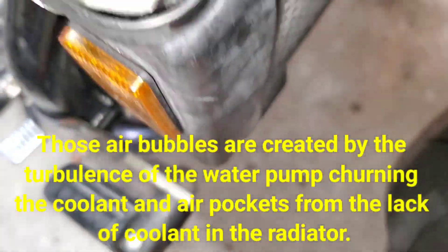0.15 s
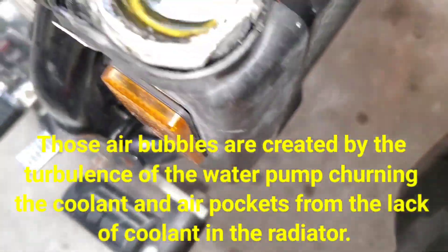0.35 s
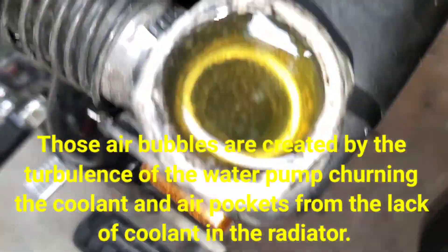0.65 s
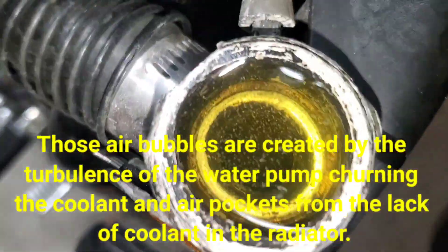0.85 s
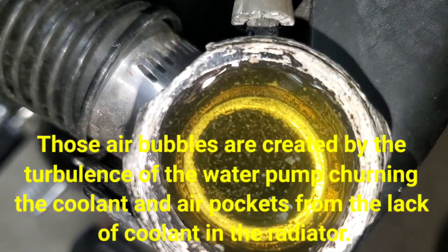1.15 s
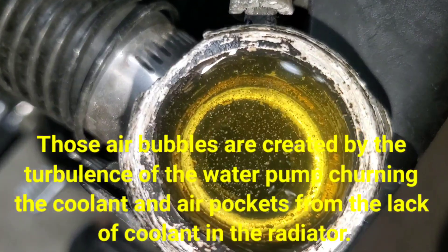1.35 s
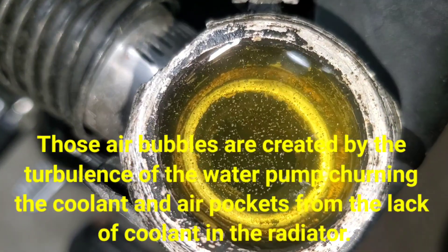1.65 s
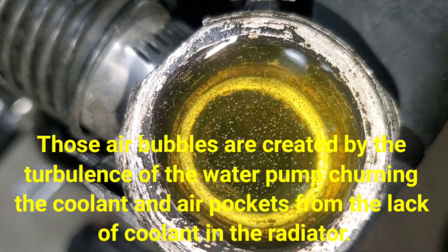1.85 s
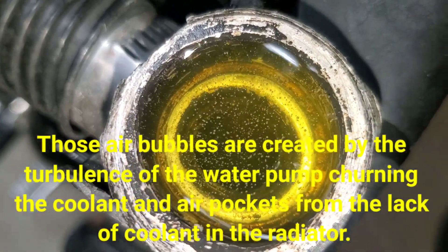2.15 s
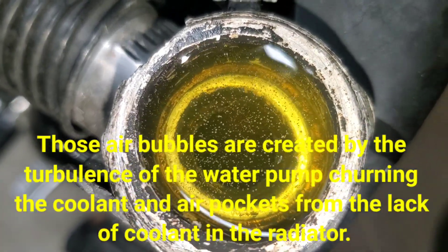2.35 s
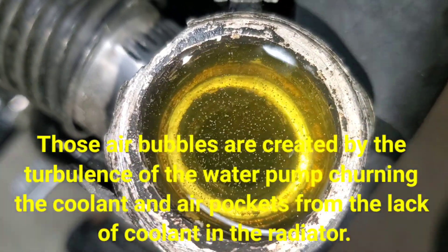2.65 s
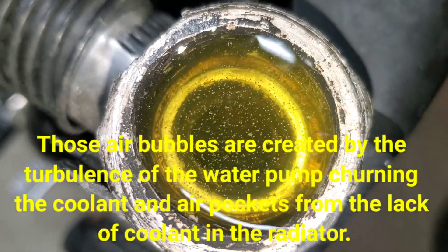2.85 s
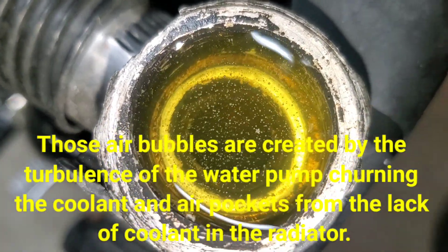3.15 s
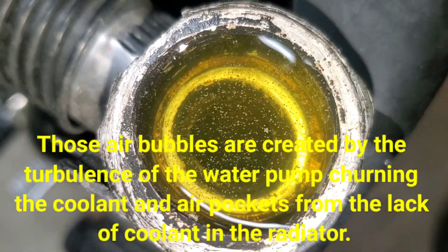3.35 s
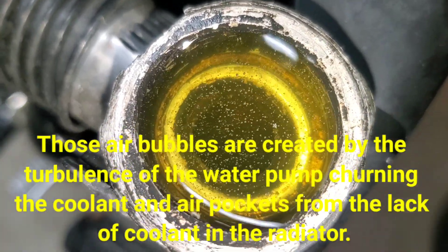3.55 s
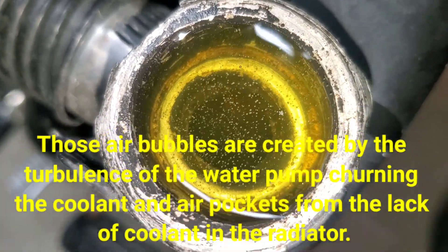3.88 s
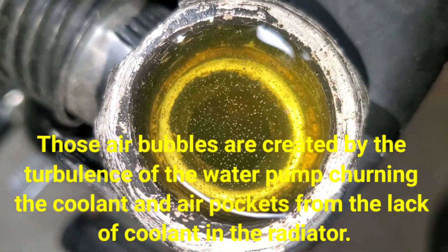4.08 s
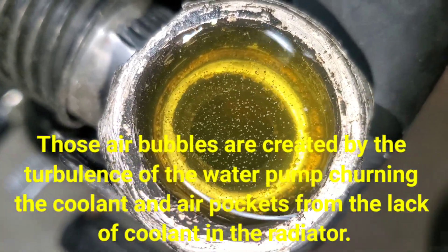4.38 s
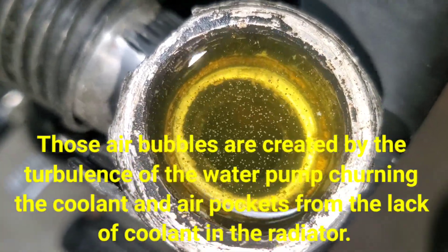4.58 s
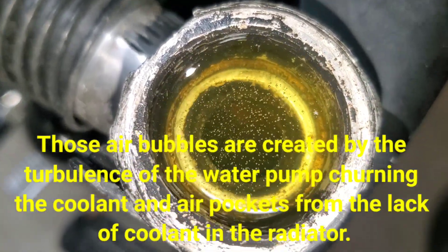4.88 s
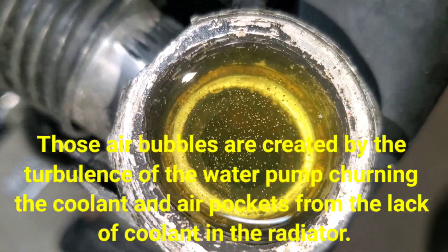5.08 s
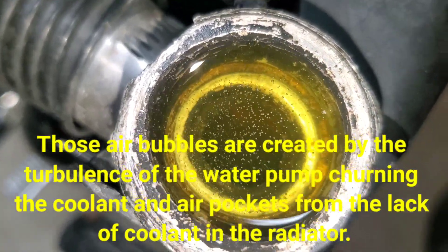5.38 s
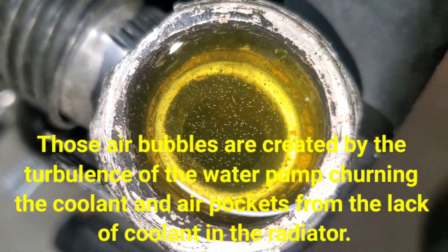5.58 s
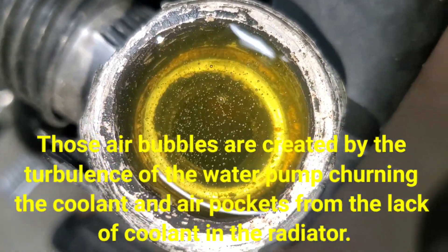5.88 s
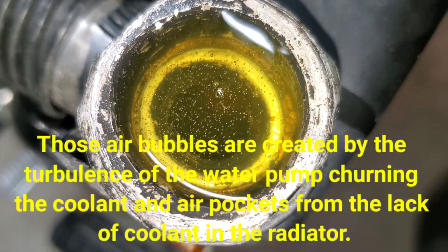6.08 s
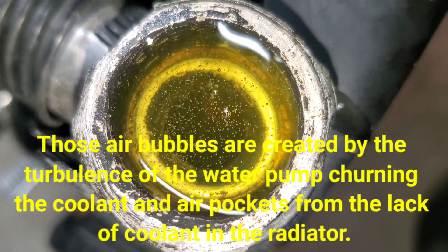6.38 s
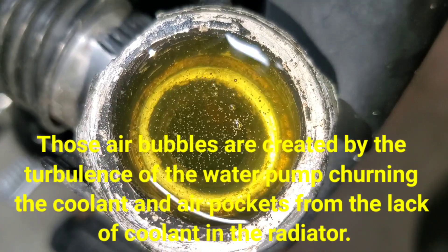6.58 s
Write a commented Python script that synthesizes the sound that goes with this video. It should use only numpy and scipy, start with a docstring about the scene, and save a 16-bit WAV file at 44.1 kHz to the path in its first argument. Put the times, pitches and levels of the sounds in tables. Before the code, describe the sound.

A four-cylinder motorcycle engine is heard close up in a garage with slight reverberation. From 0 to 4.4 seconds it idles unevenly: low, lumpy exhaust thumps about sixteen times a second, one stronger than the others, ringing the pipe and silencer. Over this lie broad chain and bearing hiss, rapid valve tapping, a thin high cover resonance and a gear whine around 1 kilohertz. The idle stumbles near 1.8, 2.5, 2.9, 3.2 and 3.9 seconds, sagging slightly with heavier, hollow thuds. At 4.4 the throttle is twisted; the engine climbs to over three times idle speed by 4.9, the firings merging into a boom with intake bark, rushing air and raspy cracks. It shuts and winds down from about 4.9 to 6, roughening as it falls. The mechanical noise becomes much quieter around 6.1, then grows slightly as a slower, weaker, rougher idle continues until 6.7.

```python
"""A four-cylinder motorcycle idles lumpily in a garage, stumbles, is blipped once and sinks to a slower idle.
Uneven firings thump and ring the exhaust pipe and silencer; at speed they merge into a boom and crack
through the engine block. The open throttle barks with pure tones and rushing air. Close by, chain and
bearings hiss, valves tap, a thin cover sings and a gear whines in step with the engine."""
import sys
import numpy as np
from scipy import signal
from scipy.io import wavfile
from scipy.ndimage import uniform_filter1d

SR = 44100
rng = np.random.default_rng(int(sys.argv[2]) if len(sys.argv) > 2 else 0)


def inscribe(sig):
    """Save sig as 16-bit PCM at rate SR to the path in sys.argv[1].

    A 1-D sig is mono; a 2-D sig holds one channel per row.
    Samples are clipped to [-1, 1] before scaling.
    """
    pcm = np.round(np.clip(np.atleast_2d(sig).T, -1, 1) * 32767)
    wavfile.write(sys.argv[1], SR, pcm.astype(np.int16))


N = 296793

# the cylinders in firing order: (strength at idle, strength in a stumble, ring of its thump [Hz])
CYLINDERS = [(1, .9, 172), (.13, .18, 81), (.5, .74, 117), (.26, .06, 175)]
# one twist of the grip: when it starts, then how long the throttle opens, stays open and closes
THROTTLE_AT_S, OPEN_S, HOLD_S, CLOSE_S = 4.42, .16, .24, .12


def from_db(db):
    """Turn decibels into gain."""
    return 10 ** (np.asarray(db) / 20)


def rms_one(x):
    """Scale to an average power of 1."""
    return x / np.sqrt(np.mean(x ** 2) + 1e-20)


def in_time(rows):
    """Read a curve of (time, value) at every sample."""
    seconds, values = np.transpose(rows)
    return np.interp(np.arange(N) / SR, seconds, values)


def at_hz(points, hz):
    """Read a curve of (frequency, value) at any pitch, along a logarithmic frequency axis."""
    frequencies, values = np.transpose(points)
    return np.interp(np.log(hz), np.log(frequencies), values)


def gate(start, attack, hold, release):
    """Rise from 0 to 1, hold and fall back, all in seconds."""
    return np.interp(np.arange(N) / SR, start + np.cumsum([0, attack, hold, release]), [0, 1, 1, 0])


def cut(x, hz, kind, order=2):
    """Butterworth filter: keep the low, the high or a band of frequencies."""
    return signal.sosfilt(signal.butter(order, hz, kind, fs=SR, output="sos"), x)


def drift(rate):
    """Slow random wander with spread 1; a higher rate [Hz] wanders faster."""
    step = 40   # samples between the points of the wander
    r = np.exp(-2 * np.pi * rate * step / SR)
    noise = rng.standard_normal(N // step + 2002)
    slow = signal.lfilter([1], [1, -2 * r, r * r], noise)[2000:]   # skip the filter's start
    return np.interp(np.arange(N) / step, np.arange(len(slow)), rms_one(slow))


def resonate(x, modes):
    """Ring a set of resonances side by side, each given as (frequency, width, signed gain)."""
    out = 0
    for hz, width, gain in modes:
        r = np.exp(-np.pi * width / SR)   # a wider resonance dies faster
        feedback = [1, -2 * r * np.cos(2 * np.pi * hz / SR), r * r]
        out = out + gain * (1 - r * r) / 2 * signal.lfilter([1, 0, -1], feedback, x + 1e-18)
    return out


def evened(x, size=9000):
    """Hold the slow power at 1, averaged twice over `size` samples."""
    power = uniform_filter1d(uniform_filter1d(x ** 2, size), size)
    return x / np.sqrt(np.abs(power) + 1e-16)


def fading(clicks, seconds):
    """Turn each click into an envelope that dies away."""
    return signal.lfilter([1], [1, -np.exp(-1 / (seconds * SR))], clicks + 1e-18)


def garage(x, t60, wet_db):
    """Add a diffuse tail that falls 60 dB in t60 seconds and differs left and right."""
    t = np.arange(SR // 2) / SR
    tail = rng.standard_normal((2, len(t))) * from_db(-60 * t / t60)
    tail /= np.sqrt(np.sum(tail ** 2, axis=1, keepdims=True))
    wet = from_db(wet_db)
    echo = signal.fftconvolve(x[None], tail, axes=1)[:, :N]
    return (x + wet * echo) / np.hypot(1, wet)


def stumbles(lag_s):
    """Depth of stumbling: the fourth cylinder all but fades and the third catches, along a bell curve."""
    # (time of the deepest point [s], spread of the bell [s], depth [0-1])
    bells = [(1.76, .04, .8), (2.52, .05, .4), (2.86, .04, .8), (3.17, .075, 1), (3.88, .04, .4)]
    t = np.arange(N) / SR - lag_s
    return sum(depth * np.exp(-.5 * ((t - middle) / spread) ** 2) for middle, spread, depth in bells)


def misfiring():
    """How badly the engine runs, 0-1: in each stumble, and for good from the start of the blip."""
    rough_from_blip = .85
    blip_begun = np.clip((np.arange(N) / SR - THROTTLE_AT_S) / OPEN_S, 0, 1)   # rises as the throttle opens
    return np.clip(stumbles(0) + rough_from_blip * blip_begun, 0, 1)


def cylinder(turn):
    """Which cylinder's quarter of the cycle it is; `turn` counts four-stroke cycles."""
    return (turn * len(CYLINDERS)).astype(int) % len(CYLINDERS)


def strokes(turn, spread_db, count):
    """Clicks spaced evenly round the cycle, each of slightly different strength."""
    at = np.flatnonzero(np.diff(np.floor(turn * count)) > 0) + 1
    clicks = np.zeros(N)
    clicks[at] = from_db(spread_db * rng.standard_normal(len(at)))
    return clicks


def firings(turn, spread_db):
    """One pulse per cylinder and cycle; weak cylinders make the idle lope."""
    idle, stumbling, _ = np.array(CYLINDERS)[cylinder(turn)].T
    strength = idle + misfiring() * (stumbling - idle)
    return strokes(turn, spread_db, count=4) * strength


def cover(rush_db):
    """The engine's shaking keeps a few narrow resonances of a thin cover singing."""
    # (frequency [Hz], width [Hz], signed gain)
    cover_modes = [(2503, 18, .4), (2603, 20, -1), (2652, 20, .7)]
    usual_db, follows = -48.5, .5   # follows: share of the swing of the mechanical noise
    level_db = usual_db + follows * (rush_db - np.median(rush_db))
    return evened(resonate(rng.standard_normal((2, N)), cover_modes)) * from_db(level_db)


def rush(turn, revs):
    """Chain, bearings and gears hiss in every band, pulsing with the valve strokes."""
    # hiss that counts double at idle and once at full revs: (frequency [Hz], level [dB])
    idle_colour = [(250, 3), (330, -2), (420, -4.5), (475, -1), (560, -7.5), (850, -4.5), (1200, -6),
                   (1800, -5.5), (2650, -5), (3800, -7.5), (5200, -9), (6300, -10.5), (8200, -11),
                   (14500, -12.5)]
    # hiss that comes in with the revs: (frequency [Hz], level [dB])
    rev_colour = [(270, 2.5), (400, -12.5), (500, -6.5), (650, -16.5), (950, -7.5), (1300, -7.5),
                  (2000, -8), (2650, -4.5), (3900, -10.5), (8000, -13), (14500, -16)]
    # how alike left and right are: (frequency [Hz], likeness [0-1])
    likeness = [(100, .97), (250, 0.51), (500, 0.7), (1000, 0.01), (15000, 0.015)]
    out = 0
    edges = 230 * 2 ** (np.arange(20) / 3)   # third-octave bands [Hz]
    white = rng.standard_normal((2, 2, N))
    for k, (low, high) in enumerate(zip(edges, edges[1:])):
        mid, side = cut(white[k % 2], [low, high], "band")   # neighbouring bands use separate noise
        hz = np.sqrt(low * high)
        alike = np.clip(at_hz(likeness, hz), -1, 1)
        hz = np.clip(hz, 330, 14000)
        colour_db = (2 - revs) * at_hz(idle_colour, hz) + revs * at_hz(rev_colour, hz)
        gain = from_db(colour_db + .62 * drift(30))
        stereo = np.sqrt(1 + alike) * mid + np.sqrt(1 - alike) * side * [[1], [-1]]
        out = out + gain * stereo
    # hold the treble steady before the pulsing is added
    treble_power = uniform_filter1d(cut(out.mean(axis=0), [1500, 12000], "band") ** 2, size=8000)
    pulsing = evened(1 + .5 * fading(strokes(turn, spread_db=5.5, count=8), seconds=.00037))
    return out / np.sqrt(treble_power) * pulsing * from_db(drift(2.35))


def valves(turn):
    """Eight valve taps a cycle rattle the engine cases, with separate noise left and right."""
    # (frequency [Hz], width [Hz], signed gain)
    cases = [(635, 28, 0.66), (850, 47, 0.32), (1325, 22, 0.64), (2013, 93, -0.44), (2627, 71, 0.69),
             (3050, 220, 0.2), (3350, 170, 0.079), (4330, 140, -0.24), (6340, 280, 0.2)]
    envelope = fading(strokes(turn, spread_db=3, count=8), seconds=.007)
    taps = envelope * rng.standard_normal((2, N))
    return evened(resonate(taps, cases))


def whine(turn, speed, throttle, revs):
    """Gear teeth mesh at a pitch tied to engine speed; the tone beads with each firing and breaks up if rough."""
    # level before the changes below: (time [s], level [dB])
    whine_curve = [(0, -38), (.4, -38), (.8, -39.3), (3.4, -39.3), (3.7, -37.5), (4.07, -37.5), (4.14, -41),
                   (4.4, -37), (5.3, -43), (5.6, -40.5), (5.85, -45), (6, -43.5), (6.15, -48.5),
                   (6.4, -44.5), (6.73, -43.5)]
    # how the gear case passes the whine: (frequency [Hz], level [dB])
    whine_colour = [(880, -1), (1020, 1.5), (1110, -2), (1230, -9), (1430, 1), (1560, -4), (1680, -1),
                    (2000, -6), (3500, -11)]
    teeth = 65.7   # whine cycles per engine cycle
    stumble_db, throttle_db = -2, -3   # change in a full stumble and with the throttle open
    level_db = in_time(whine_curve) + at_hz(whine_colour, teeth * speed)
    level_db = level_db + stumble_db * stumbles(0) + throttle_db * throttle
    surge = 2 * np.pi * turn
    wobble = (.55 + .3 * misfiring() + .5 * revs) * drift(45)
    mesh = np.sin(teeth * surge - .7 * np.cos(surge) + wobble)
    uneven_db = (2.2 + .8 * misfiring()) * drift(25)
    beads = evened(from_db(2.2 * np.cos(4 * surge) + 1.5 * np.sin(surge) + uneven_db))
    return evened(garage(mesh, t60=.06, wet_db=0), size=1800) * beads * from_db(level_db)


def bark(turn, speed, throttle):
    """Intake gulps sound a fan of engine orders and rushing air; louder with speed and open throttle."""
    # how the airbox passes the orders: (frequency [Hz], throttle open [dB], throttle shut [dB])
    airbox = np.array([(250, -38, -35), (300, -34, -34), (335, -38, -46), (380, -33, -46), (430, -41, -46),
                       (490, -28.5, -33), (540, -34, -46), (600, -29.5, -45), (690, -29.5, -44),
                       (760, -33, -46), (840, -29, -38), (920, -32, -48), (1010, -37, -41),
                       (1150, -50, -56)])
    # resonances of the rushing air: (frequency [Hz], width [Hz], signed gain)
    intake = [(350, 58, 0.67), (500, 73, -0.75), (695, 85, 1.0), (970, 66, -0.081)]
    air_open_db, air_shut_db = -37, -55   # at top speed
    db_per_octave = 15   # of engine speed
    odd_order_db = -4    # odd orders of the intake tone are weaker
    fan = 0
    for order in range(5, 23):
        hz = order * speed
        open_db, shut_db = at_hz(airbox[:, [0, 1]], hz), at_hz(airbox[:, [0, 2]], hz)
        db = throttle * open_db + (1 - throttle) * shut_db
        gain = from_db(db + odd_order_db * (order % 2) + 1.5 * drift(12))
        fan = fan + gain * np.sin(2 * np.pi * (order * turn + rng.random()) + .2 * drift(20))
    air = fading(firings(turn, spread_db=1.5), seconds=.0072) * rng.standard_normal(N)
    air = evened(cut(resonate(air, intake), 570, "high"), size=3000)
    air = air * from_db(air_shut_db + throttle * (air_open_db - air_shut_db))
    speed_db = db_per_octave * np.log2(speed / speed.max())
    return garage((fan + air) * from_db(speed_db), t60=.12, wet_db=-7)


def rasp(turn, revs, throttle):
    """At speed every firing cracks through the engine block, hardest with the throttle open."""
    # (frequency [Hz], width [Hz], signed gain)
    block = [(850, 290, 0.38), (1430, 240, -0.66), (2070, 610, 0.63), (2620, 320, -1.17)]
    level_db, shut_db = -34.5, -5   # at full revs with the throttle open; change when shut
    knocks = firings(turn, spread_db=3) + .3 * strokes(turn, spread_db=3, count=4)
    cracks = resonate(fading(knocks, seconds=.002) * rng.standard_normal(N), block)
    loudness = revs * from_db(level_db + shut_db * (1 - throttle))
    return garage(evened(cracks, size=3000) * loudness, t60=.25, wet_db=-3)


def boom(turn, speed, throttle):
    """Fast firings merge into low tones that sweep the exhaust's resonances and roughen as the throttle shuts."""
    # levels before the colour below, at top speed:
    # (engine order, throttle open [dB], throttle shut [dB], slope [dB per octave of engine speed])
    boom_orders = [(1, -29, -29, 0), (2, -17.5, -30, 0), (3, -33, -27, 2.5), (4, -27.5, -27, 6),
                   (6, -31, -33, 4)]
    # how the exhaust passes the tones: (frequency [Hz], level [dB])
    boom_colour = [(38, -32), (45, -0.5), (55, 5), (66, 5), (73, -1.5), (92, 1), (108, -4), (140, 1),
                   (170, 4), (195, 1.5), (210, 4.5), (260, -11.5), (320, -11)]
    lasts_s, fade_s = 1.53, .089   # from the twist until the engine is back at idle
    tones = 0
    rough = 1 - .7 * throttle
    for order, open_db, shut_db, slope_db in boom_orders:
        db = shut_db + throttle * (open_db - shut_db) + slope_db * np.log2(speed / speed.max())
        gain = from_db(db + at_hz(boom_colour, order * speed) + 3 * rough * drift(25))
        tones = tones + gain * np.sin(2 * np.pi * order * turn + .4 * rough * drift(20))
    swell = gate(THROTTLE_AT_S, fade_s, lasts_s - 2 * fade_s, fade_s)
    return garage(swell * tones, t60=.4, wet_db=-15)


def thump(ring_hz):
    """One gas pulse, centred on its suction peak: a low swell, rising to its ring as the valve shuts."""
    swell_hz, swell_s, shut_s, ring_s = 76, .0075, .004, .0086
    t = np.arange(-SR // 20, SR // 20 + 1) / SR
    hz = swell_hz + (ring_hz - swell_hz) * (1 + np.tanh(t / shut_s)) / 2
    angle = 2 * np.pi * np.cumsum(hz) / SR
    envelope = np.exp(np.minimum(t / swell_s, -t / ring_s))
    return -np.cos(angle - angle[len(t) // 2]) * envelope


def exhaust(turn, revs):
    """Each firing thumps and rings the pipe and the silencer, which thuds more in a stumble."""
    # force of the firings, before the change with revs: (time [s], level [dB])
    throb = [(0, -19.5), (4.35, -19.5), (4.55, -13.5), (4.85, -25), (5.4, -24.5), (5.75, -27.5),
             (6.35, -26.5), (6.73, -22)]
    # overtones of the exhaust pipe: (frequency [Hz], width [Hz], signed gain)
    pipe_modes = [(212.7, 9.4, -0.71), (248.5, 8.9, 0.56), (314, 19, -0.23), (474.5, 14, 0.23)]
    # standing waves that lift or hollow the thumps: (frequency [Hz], width [Hz], signed gain)
    standing_waves = [(46, 12.7, 1), (59.7, 8.7, -1.34), (97, 6.6, 0.34), (116.4, 67, -0.58),
                      (142.4, 4.6, 0.62), (203, 26, -0.28)]
    pipe_db, silencer_db = -19.5, -11   # against the thumps, the silencer at a smooth idle
    silencer_stumble_db, silencer_rev_db = 14, -10   # change in a full stumble and at full revs
    gas_rev_db = -7   # the whole throb gives way to the boom at full revs
    uneven_db = (1.5 * (cylinder(turn) > 0) + 1.2 * misfiring()) * drift(40)
    pulses = firings(turn, spread_db=.7) * from_db(uneven_db)
    thumps = 0
    for k, (_, _, ring_hz) in enumerate(CYLINDERS):
        own_pulses = pulses * (cylinder(turn) == k)
        thumps = thumps + signal.fftconvolve(own_pulses, thump(ring_hz), "same")
    thumps = evened(thumps + resonate(thumps, standing_waves))
    pipe = from_db(pipe_db) * evened(cut(resonate(pulses, pipe_modes), 560, "low"))
    silencer = evened(cut(resonate(pulses, [(61.1, 4.7, 1)]), 43.2, "high", order=4))
    thud_db = silencer_db + silencer_stumble_db * stumbles(0) + silencer_rev_db * revs + 2.5 * drift(9)
    gas = thumps + pipe + silencer * from_db(thud_db)
    return garage(gas * from_db(in_time(throb) + gas_rev_db * revs), t60=.4, wet_db=-17)


def scene():
    """Everything follows the turning of the camshaft, which slows a little after each stumble."""
    # engine speed before the stumbles: (time [s], speed [four-stroke cycles per s])
    speed_curve = [(0, 16.204), (.3, 16.401), (.9, 15.652), (1.3, 15.609), (2.35, 15.807), (2.8, 15.264),
                   (3.3, 15.014), (3.7, 15.414), (4, 15.326), (4.42, 16.218), (4.53, 22), (4.7, 40),
                   (4.8, 49.5), (4.88, 53), (4.99, 50), (5.18, 39), (5.35, 33.5), (5.5, 27.8), (5.7, 22.2),
                   (5.93, 16.5), (6.12, 14), (6.73, 13.8)]
    # mechanical noise, to which hiss and valves are set: (time [s], level [dB])
    rush_curve = [(0.03, -35.5), (2.27, -36), (3.12, -36.5), (4.38, -35.5), (4.71, -26), (4.92, -26.5),
                  (5.16, -32.5), (6.07, -45.5), (6.68, -39)]
    sag, sag_lag_s = .077, .04   # share of the speed lost in a full stumble, and how much later
    hiss_db, valves_db, valves_rev_db = -2.5, -3.5, -8   # against the curve; valves' change at full revs
    speed = in_time(speed_curve) * (1 - sag * stumbles(sag_lag_s))
    turn = .2 + np.cumsum(speed) / SR   # cycles, from a start part-way round
    revs = np.clip((speed - 16) / 22, 0, 1)   # 0 at idle, 1 at full revs
    throttle = gate(THROTTLE_AT_S, OPEN_S, HOLD_S, CLOSE_S)
    rush_db = in_time(rush_curve)
    hiss = from_db(hiss_db) * rush(turn, revs)
    taps = from_db(valves_db + valves_rev_db * revs) * valves(turn)
    machinery = from_db(rush_db) * (hiss + taps) + cover(rush_db) + whine(turn, speed, throttle, revs)
    at_speed = bark(turn, speed, throttle) + rasp(turn, revs, throttle) + boom(turn, speed, throttle)
    return machinery + at_speed + exhaust(turn, revs)


def record(dry):
    """Cut the deepest bass and the top steeply."""
    without_bass = signal.sosfiltfilt(signal.butter(4, 34, "high", fs=SR, output="sos"), dry)
    return signal.sosfilt(signal.ellip(12, .1, 90, 15450, fs=SR, output="sos"), without_bass)


dry = scene()
out = record(dry)
inscribe(out)
```